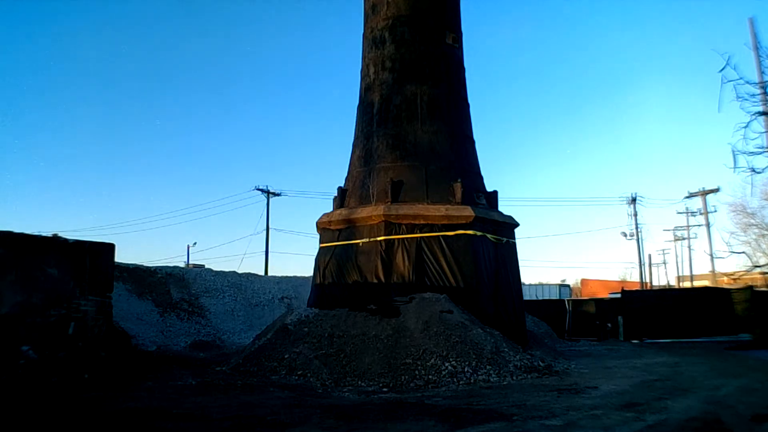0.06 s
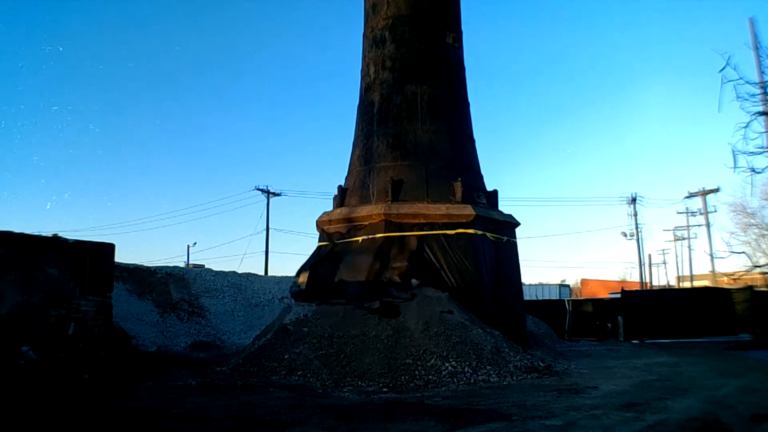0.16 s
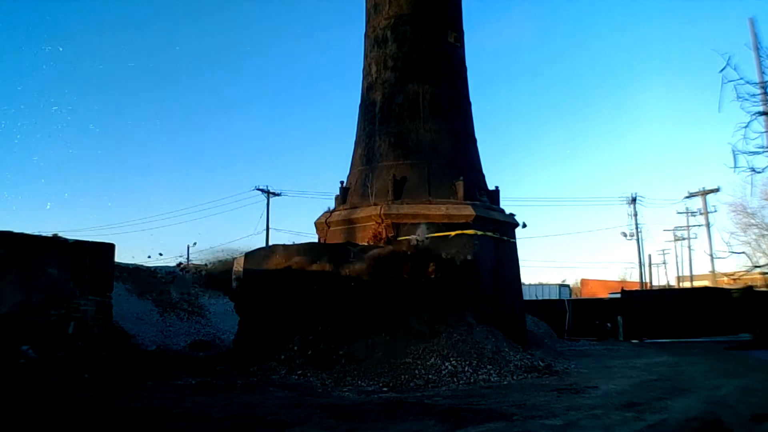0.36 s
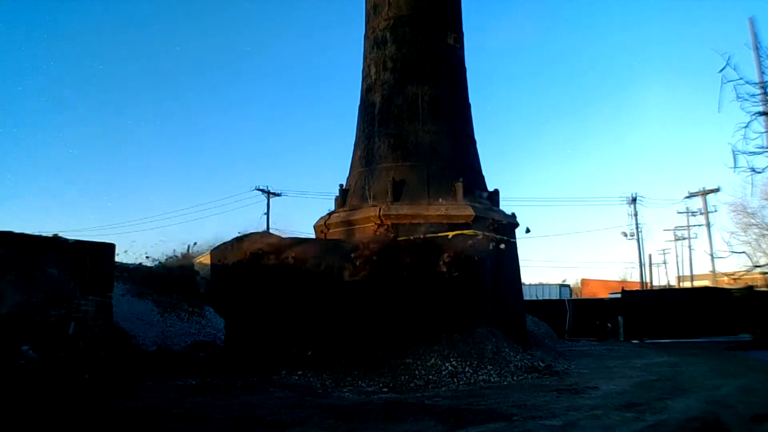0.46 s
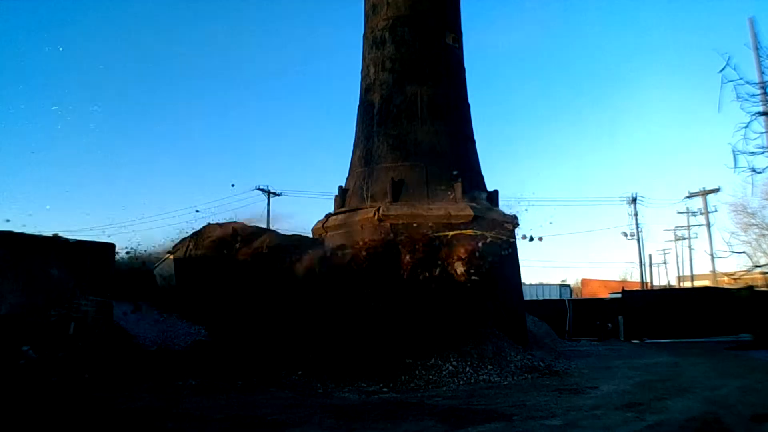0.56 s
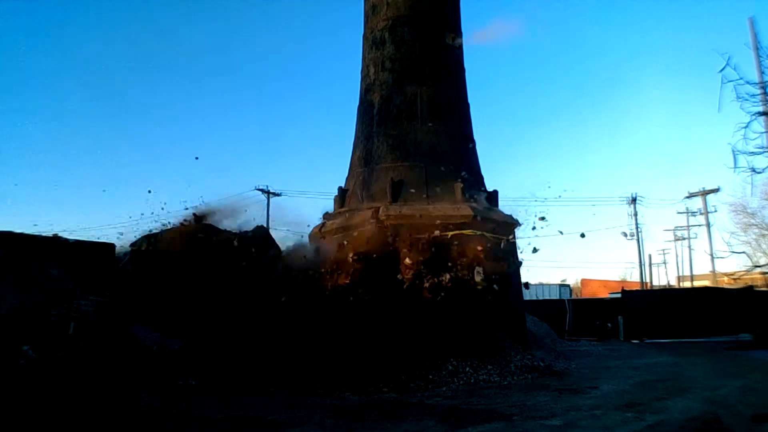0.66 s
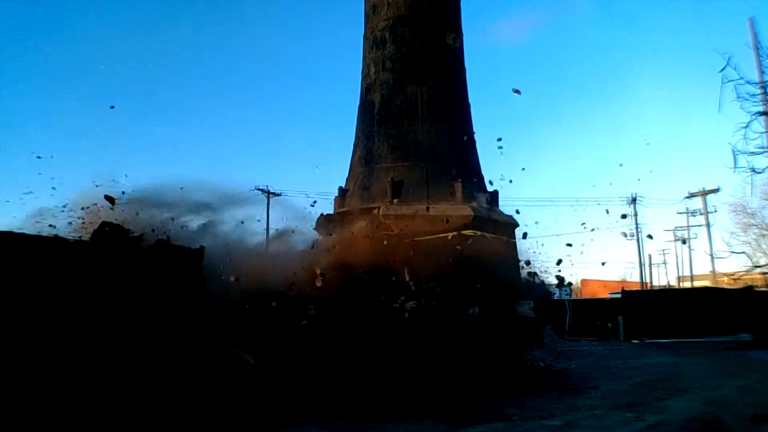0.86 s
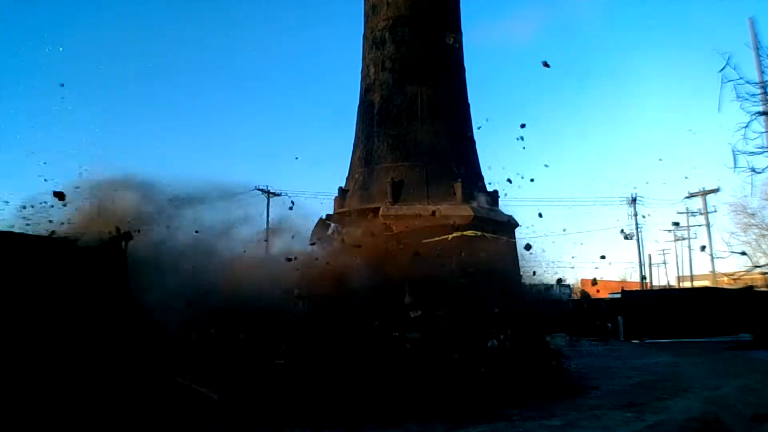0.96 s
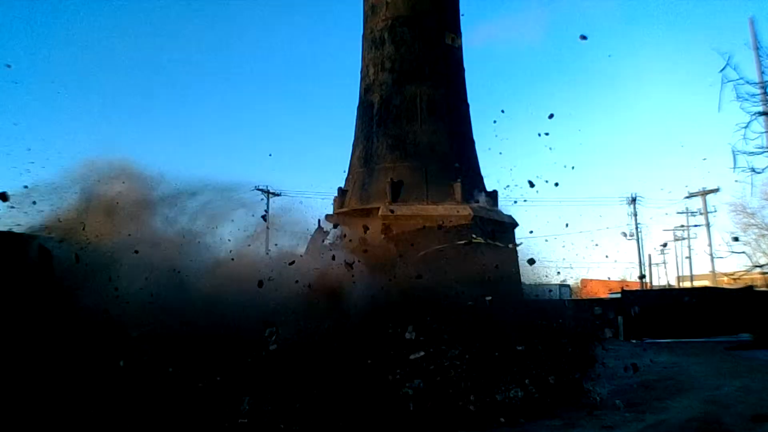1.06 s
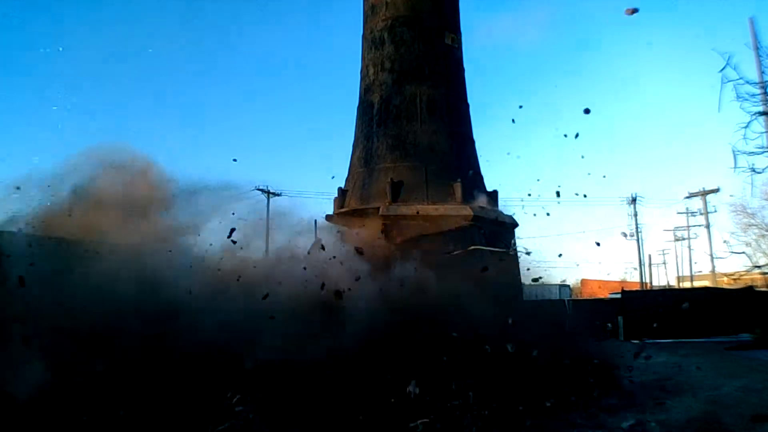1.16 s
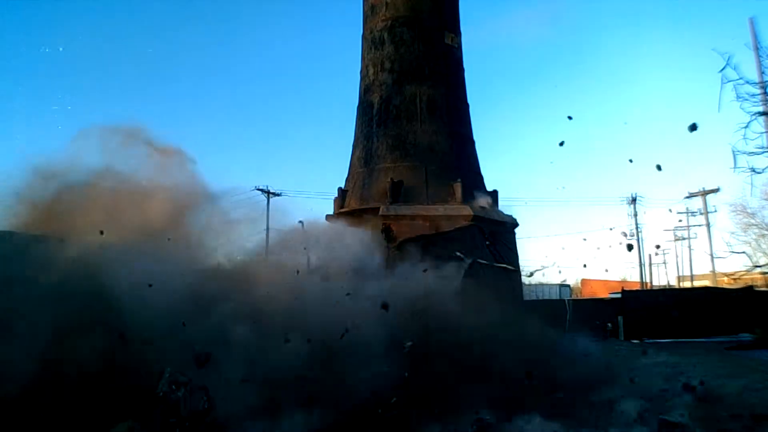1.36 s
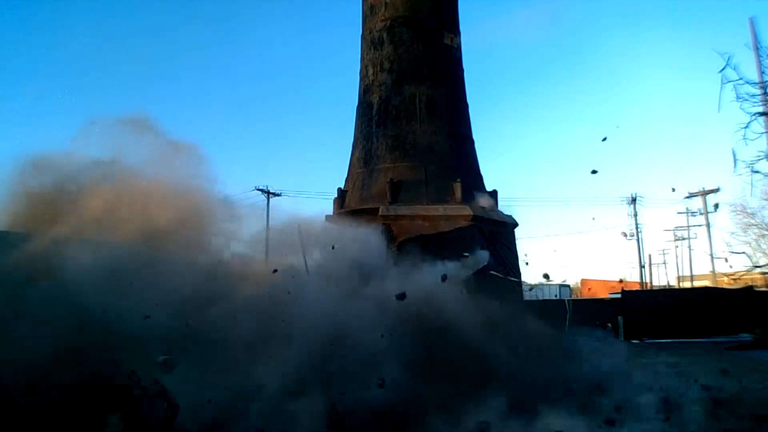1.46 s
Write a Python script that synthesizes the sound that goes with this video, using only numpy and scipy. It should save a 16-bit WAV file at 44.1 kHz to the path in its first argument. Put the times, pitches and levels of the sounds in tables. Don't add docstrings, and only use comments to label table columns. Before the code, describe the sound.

A demolition explosion at the foot of a brick chimney: near quiet, a hard cracking blast with low roar, a duller second thump, a sharper later burst, then stones and dust raining down, heard close outdoors.

```python
import sys
import numpy as np
from scipy import signal
from scipy.fft import rfft, irfft, next_fast_len
from scipy.io import wavfile
from scipy.ndimage import map_coordinates

SR = 44100
rng = np.random.default_rng(int(sys.argv[2]) if len(sys.argv) > 2 else 0)


def volts(x):
    e = np.asarray(x, float) / 20
    return 10 ** e


def generate_wav(sig):
    pcm = np.round(np.clip(np.atleast_2d(sig).T, -1, 1) * 32767).astype(np.int16)
    wavfile.write(sys.argv[1], SR, pcm)


N = 66150


def unit(x):
    return x / np.sqrt(np.mean(x ** 2) + 1e-20)


def along(points, hz):
    f, v = np.transpose(points)
    return np.interp(np.log(hz + 1), np.log(f + 1), v)


def curve(rows):
    s, *cols = np.transpose(rows)
    return [np.interp(np.arange(N) / SR, s, v) for v in cols]


def wobble(rate):
    return map_coordinates(rng.standard_normal(N // 40), [np.arange(N) * rate / SR])


def filtered(x, response):
    m = next_fast_len(N + SR // 2)
    return irfft(rfft(x, m) * response(np.fft.rfftfreq(m, 1 / SR)), m)[..., :N]


def rush(spectrum):
    white = rng.standard_normal(N)
    return unit(filtered(white, lambda hz: volts(along(spectrum, hz)) * (hz > 8)))


def yard():
    # (frequency [Hz], level [dB])
    air_colour = [(60, -10), (150, -7), (400, 0.5), (900, 3.5), (1300, 0.5), (2600, -12.5), (5000, -17.5),
                  (9000, -26)]
    t = np.arange(N) / SR
    air = volts(-57.5 + wobble(47.9)) * rush(air_colour)
    whine_hz = 9500 + 70 * wobble(350)
    whine = volts(-80 + 3.6 * wobble(24)) * np.sin(2 * np.pi * np.cumsum(whine_hz) / SR)
    whine *= np.clip((0.6 - t) / 0.08, 0, 1)
    hiss_db = -82 - 10 * np.exp(-((t - 0.21) / 0.022) ** 4)
    return air + whine + volts(hiss_db) * rng.standard_normal(N)


def ground():
    # (time [s], level [dB])
    shake_levels = [(0, -69), (.15, -67), (.185, -60), (.21, -41), (.25, -36), (.3, -35), (.36, -37),
                    (.45, -40.5), (.52, -47), (.56, -47), (.68, -48), (.72, -45), (.82, -43), (.9, -51),
                    (1.02, -53.5), (1.08, -53), (1.2, -51), (1.36, -54.5), (1.5, -51)]
    # (frequency [Hz], level [dB per Hz])
    soil_colour = [(18, 3.5), (30, 5.5), (70, -2), (110, -2), (160, -11.5), (400, -54.5)]
    rumble = unit(volts(0.92 * wobble(23.3)) * rush(soil_colour))
    return volts(curve(shake_levels)[0]) * rumble


def rubble():
    # (time [s], level [dB], dust over stones [dB])
    rubble_levels = [(.55, -71, 0), (.635, -63.5, 8.5), (.655, -52, -2), (.76, -43.5, 0.5),
                     (.9, -50.5, -1.5), (.98, -46.5, -3.5), (1.07, -44.5, -2.5), (1.14, -40, -4.5),
                     (1.21, -39.5, -3), (1.3, -44, 0), (1.35, -51, 0.5), (1.5, -52, -1.5)]
    # (frequency [Hz], level [dB per Hz])
    dust_colour = [(500, -27), (1100, -1.5), (2000, -6.5), (4000, -9), (6000, -7.5), (9000, -18),
                   (15500, -30)]
    stones_per_s, stone_hz, ring_cycles = 2500, 700, 2.74
    draw = rng.random((int(stones_per_s * N / SR), 2))
    t = np.arange(700) / SR
    spread = np.exp(0.68 * rng.standard_normal(len(draw)))
    hz = np.clip(stone_hz * spread, 190, 12000)[:, None]
    size = volts(-2.5 * np.log(draw[:, 1:] + 0.033)) * (stone_hz / hz) ** 0.28
    knock = size * np.sin(2 * np.pi * hz * t) * np.exp(-2 * t * hz / ring_cycles)
    at = (draw[:, :1] * N).astype(int) + np.arange(len(t))
    stones = unit(np.bincount(at.ravel(), knock.ravel())[:N])
    level_db, dust_db = curve(rubble_levels)
    start = np.clip((np.arange(N) / SR - rubble_levels[0][0]) / 0.012, 0, 1)
    mix = volts(1) * stones + volts(-6 + dust_db) * rush(dust_colour)
    return start * volts(level_db + 1.05 * wobble(70.08)) * mix


def rings():
    # (time [s], peak [dB], pitch [Hz], swell [s], time to fall 60 dB [s])
    ring_table = [(.1640, -41, 104, .006, 0.35), (.7800, -22, 520, 0.0027, 0.078),
                  (.8070, -23, 1460, 0.0067, .13), (.2060, -24.5, 480, 0.0015, 0.118),
                  (.2070, -27, 705, 0.0018, .12), (.5710, -42.5, 1200, .004, 0.13),
                  (0.56, -48, 1300, .01, .4), (.5520, -33.5, 615, .001, 0.027),
                  (.7200, -38.5, 114, .008, 0.14), (1.0750, -48, 75, .006, .15),
                  (1.3, -43, 124, 0.0046, 0.12), (1.2050, -39, 110, .008, 0.19),
                  (1.2500, -39, 133, .005, 0.11), (.4700, -43.5, 210, .01, .2)]
    t, out = np.arange(N) / SR, np.zeros(N)
    drift = np.cumsum(0.02004 * wobble(60)) / SR
    for s, db, hz, swell, t60 in ring_table:
        since = np.maximum(t - s, 0)
        loudness = volts(db - 60 * since / t60) * (1 - np.exp(-since / swell))
        out += loudness * np.sin(2 * np.pi * hz * (t - s + drift))
    return out


def cracks():
    # (time [s], peak [dB], pitch [Hz], width over pitch [ratio], time to fall 60 dB [s])
    crack_table = [(.1930, -24, 2200, 0.41, 0.047), (.1960, -45, 3400, 0.37, 0.15),
                   (.2040, -52, 7700, .07, 0.037), (.2120, -53, 11000, 1.2, .03),
                   (.2245, -35.5, 11500, 1.6, 0.026), (.2966, -45, 9000, 1, 0.027),
                   (.2080, -29, 500, 0.23, 0.13), (0.208, -21, 700, 0.25, 0.13),
                   (0.193, -45, 3730, 0.12, 0.11), (0.216, -32.5, 4500, 0.39, 0.24),
                   (.2500, -39, 3380, 1.1, 0.05), (.02, -57.5, 2643, 0.055, 1),
                   (0.213, -40, 5930, .9, 0.025), (0.222, -29.5, 5440, 0.051, 0.074),
                   (0.23, -32.5, 3580, 0.082, 0.13), (0.313, -32, 5500, 2.4, 0.013),
                   (0.551, -32, 680, 0.87, 0.037), (0.553, -49, 1290, 0.2, 0.08),
                   (.5710, -42, 1290, 0.12, 0.13), (0.586, -49, 1280, 0.2, 0.15),
                   (0.6495, -37, 3870, 1.2, 0.036), (0.677, -39, 5260, 0.8, 0.031),
                   (0.781, -26, 700, 1, 0.16), (0.778, -34, 3520, 1.1, .05), (.8050, -32, 4020, 1.2, .05),
                   (.8380, -36.5, 1290, .25, 0.14), (1.1300, -51.5, 13100, 0.65, 0.44),
                   (.2240, -32, 4500, 0.42, 0.068), (0.800, -25.5, 624, .3, 0.13),
                   (1.0250, -31.5, 296, 0.72, 0.18), (1.207, -31.5, 260, 0.62, 0.26),
                   (1.259, -32, 268, 0.36, 0.091), (1.0747, -34, 2200, 0.27, 0.038),
                   (1.077, -36.5, 4300, 0.57, .03), (1.1260, -34, 2200, .4, 0.062),
                   (1.279, -33, 1560, .25, .04), (1.3100, -33, 700, 2.3, 0.035),
                   (1.2775, -33, 4370, .4, 0.028), (1.3050, -37, 2930, 1.2, 0.028)]
    t, out = np.arange(N) / SR, np.zeros(N)

    def split_noise(hz, wide):
        def band(f):
            resonance = 1j * f * wide * hz / (hz * hz - f * f + 1j * f * wide * hz)
            return resonance ** 2 / (1 + 1j * f / hz / 2) ** 2
        return unit(filtered(rng.standard_normal(N), band))

    for s, db, hz, wide, t60 in crack_table:
        attack = np.clip((t - s) / 0.00041, 0, 1)
        fade = volts(db - 11.0 - 60 * np.maximum(t - s, 0) / t60)
        out += fade * attack * split_noise(hz, wide)
    return out


def bursts():
    # (time [s], level [dB], hold [s], time to fall 60 dB [s], treble [dB])
    burst_table = [
        (-.0200, -61.5, 0.029, 0.094, 4),
        (0.082, -63.5, 0.052, .15, 1),
        (0.198, -27.5, 0.032, 0.11, -2.5),
        (0.244, -37.5, 0.06, 0.24, 2.5),
        (0.283, -51, 0.11, 2.25, -3),
        (0.558, -39.5, 0.018, 0.061, -16),
        (0.578, -51.5, 0.047, 0.42, -6.5),
        (0.77, -33, 0.042, 0.27, -1),
        (1.468, -64, 0.017, 0.17, -1),
    ]
    # (frequency [Hz], level [dB per Hz])
    roar_colour = [(50, -50), (130, 0.5), (300, -2.5), (600, -4), (1000, -10.5), (1600, -25), (3000, -54)]
    # (frequency [Hz], level [dB per Hz])
    hiss_colour = [(500, -7), (1100, 4), (2000, -2.5), (4000, -5.5), (6000, -10), (9000, -19.5),
                   (15500, -34.5)]
    t, low, high = np.arange(N) / SR, np.zeros(N), np.zeros(N)

    def shape(since, rise, hold, t60):
        attack = 1 - np.exp(-np.maximum(since, 0) / rise)
        return attack * volts(-60 * np.maximum(since - hold, 0) / t60)

    for s, db, hold, t60, treble_db in burst_table:
        low += volts(db) * shape(t - s, 0.0041, hold, t60)
        high += volts(db + treble_db) * shape(t - s - 0.011, 0.0024, hold, t60)
    roar = unit(volts(1.4 * wobble(119.4)) * rush(roar_colour))
    hiss = unit(volts(1.1 * wobble(200)) * rush(hiss_colour))
    return low * roar + volts(-8) * high * hiss


def pushes():
    # (time [s], peak [dB], half length [ms],
    # suction over push volume [ratio, + suction after, - before])
    push_table = [(0.201, -28.5, 2.9, 3.5), (0.2062, -18, 0.36, 1.5), (0.2132, -16, 0.4, 0),
                  (0.2148, -17, 0.45, 1.5), (0.2203, -13.5, 1.3, 1.2), (0.2262, -10, 0.622, 1.2),
                  (0.2330, -14.5, 2.86, 0.5), (.2465, -19.5, .4, -0.5), (0.250, -22.5, 0.86, 0.5),
                  (0.2735, -28.5, 1.5, -2), (.5485, -29.5, 1.17, 0.7), (.5532, -25, .5, 2.8),
                  (.5624, -25, .55, 2.1), (0.5726, -24.5, 4.5, 0.85), (.6080, -35, 3.4, 1.8),
                  (.6640, -24.5, 7.7, -0.47), (0.7826, -20.5, 0.2, -0.8), (.7898, -25.5, 0.28, 0.9),
                  (.8005, -21.5, 0.19, 1), (0.8043, -24, 0.5, 1.7), (.850, -32, 0.84, 2),
                  (.9500, -41, 5.3, 2.5), (.9930, -42, 2.8, 6.5), (1.0500, -33.5, 3.1, 0.5),
                  (1.153, -26.5, 0.35, 2), (1.337, -43, 11, 2.5), (1.482, -37, 0.56, 2.4)]
    gap, widening = 3.1, 2.06
    t, out = np.arange(N) / SR, np.zeros(N)

    def hump(s, ms):
        return np.exp(-((t - s) * 1000 / ms) ** 2)

    for s, db, ms, side in push_table:
        trough_s = s + np.sign(side) * gap * ms / 1000
        trough = abs(side) / widening * hump(trough_s, widening * ms)
        out += volts(db) * (hump(s, ms) - trough)
    return out


def housing(sound):
    # (frequency [Hz], width [Hz], boost [dB, negative = cut])
    case_modes = [(1379, 164, 8.5), (2200, 67, 0.5), (2694, 620, 6), (3600, 194, 5), (4500, 700, 6.5),
                  (5510, 190, 4.5), (6300, 190, 2.5), (7700, 550, 6), (9940, 190, -17), (11930, 200, 4.5),
                  (13600, 300, 4),
                  (1077, 45, -2), (1620, 1100, 0), (3220, 36, -14), (3845, 82, -10.5), (4903, 380, -17),
                    (5800, 430, -9), (7220, 230, -17), (7890, 140, -9), (9620, 200, 0.5)]

    def case(f):
        response = 1
        for c, w, db in case_modes:
            response = response * (1 + (volts(db) - 1) * 1j * f * w / (c * c - f * f + 1j * f * w))
        return response

    return filtered(sound, case)


def scene():
    airborne = yard() + rubble() + cracks() + bursts() + pushes()
    mono = housing(airborne) + ground() + rings()
    return np.array([mono, mono])


def second_channel(sound):
    # (frequency [Hz], level [dB])
    copy_levels = [(60, -93), (95, -37), (140, -10.5), (200, -6), (500, -6), (1300, -7), (4000, -13.5),
                   (15000, -28)]
    # (frequency [Hz], lead [radians])
    copy_leads = [(80, 0.48), (200, -0.2), (300, -0.29), (900, -0.33), (3000, -0.59), (15000, -0.55)]
    # (frequency [Hz], level [dB])
    blur_levels = [(30, -44), (100, -46), (300, -18.5), (1000, -15.5), (2000, -10.5), (5000, -19),
                   (15000, -34)]
    z = signal.stft(sound, nperseg=256)[2]
    random_turn = np.exp(2j * np.pi * rng.random(z.shape))
    scrambled = signal.istft(z * random_turn, nperseg=256)[1][:N]
    blur = filtered(scrambled, lambda hz: volts(along(blur_levels, hz)))
    copy = filtered(sound, lambda hz: -volts(along(copy_levels, hz)) * np.exp(1j * along(copy_leads, hz)))
    return copy + blur


def band_limit(x):
    return signal.sosfilt(signal.butter(12, 15760, fs=SR, output="sos"), x)


def record(dry):
    pair = np.array([dry[0], second_channel(dry[1])])
    mix = filtered(pair, lambda hz: hz < 15760)
    return band_limit(mix)


dry = scene()
out = record(dry)
generate_wav(out)
```